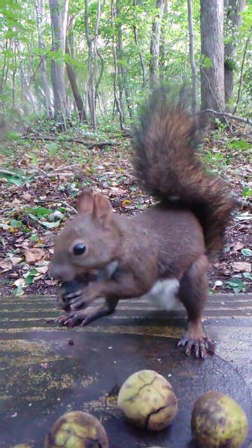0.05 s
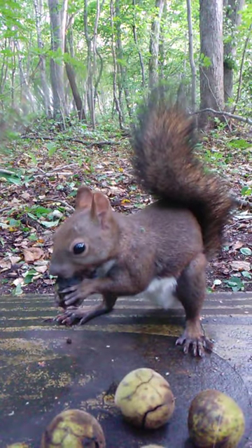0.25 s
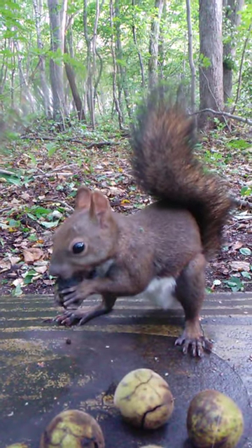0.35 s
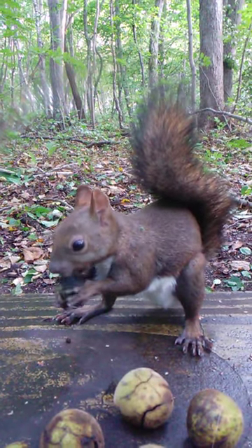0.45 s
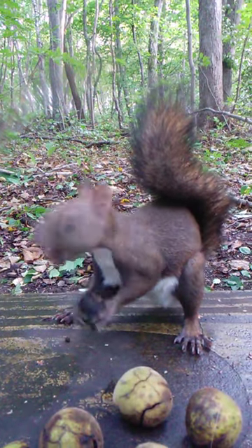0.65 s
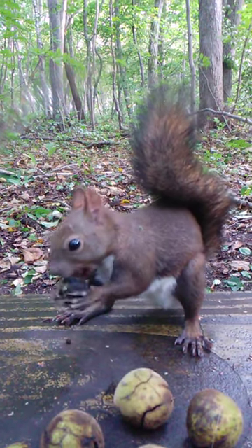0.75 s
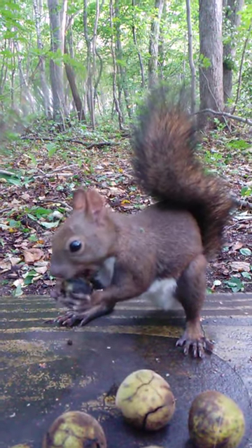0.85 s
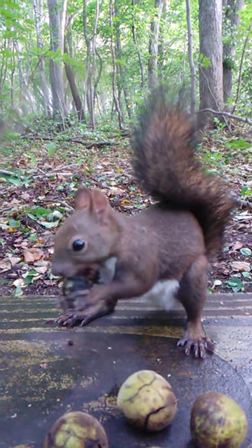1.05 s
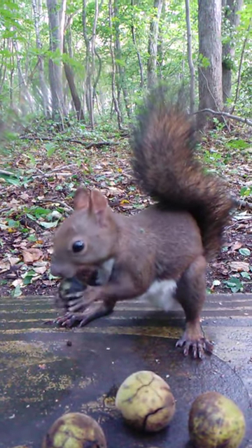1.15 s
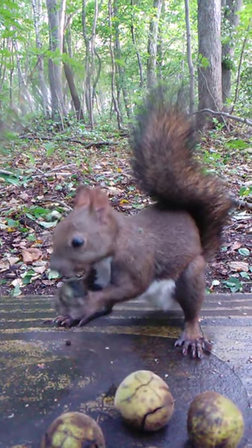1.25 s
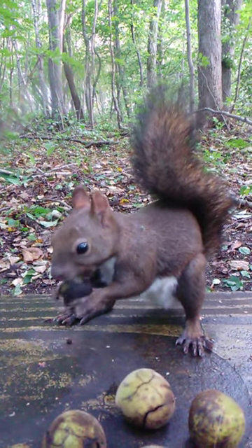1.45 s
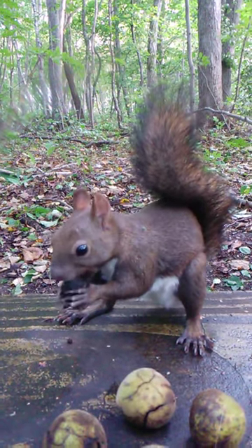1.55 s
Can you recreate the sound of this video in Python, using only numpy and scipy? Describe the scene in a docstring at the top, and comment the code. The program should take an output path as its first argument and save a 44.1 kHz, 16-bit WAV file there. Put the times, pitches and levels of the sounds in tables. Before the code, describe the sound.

Close up in a quiet wood, a squirrel gnaws a nut shell with quick dry scrapes and crisp clicks. A sharper cluster comes first, then a brief pause and softer nibbling, over a faint low rumble and hiss.

```python
"""A squirrel gnaws a walnut

The squirrel sits close by, on a table in a wood. Its teeth scrape the shell in short strokes made
of tiny slips, and now and then a chip snaps off. Both make a ringing sound whose pitch shifts
with the bite. The table top and the trees reflect the sound. Behind it lie a low outdoor rumble,
a faint hum and whine, hiss and thin high ticks."""
import sys
import numpy as np
from scipy import signal
from scipy.fft import rfft, irfft, next_fast_len
from scipy.io import wavfile
from scipy.ndimage import map_coordinates

SR = 44100
rng = np.random.default_rng(int(sys.argv[2]) if len(sys.argv) > 2 else 0)


def generate_wav(sig):
    """Save sig (samples, or channels by samples) to the path in sys.argv[1] as 16-bit PCM at SR."""
    pcm = np.round(np.clip(np.atleast_2d(sig).T, -1, 1) * 32767).astype(np.int16)
    wavfile.write(sys.argv[1], SR, pcm)


N = 70560
BLOCK = 4096  # samples of working space for short sounds


def gain(db):
    """Turn decibels into a number to multiply by."""
    return 10 ** (np.asarray(db) / 20)


def unit_rms(x):
    """Scale a sound so that its average level (rms) is 1."""
    return x / np.sqrt(np.mean(x ** 2) + 1e-20)


def add(track, start_s, sound):
    """Mix a sound into the track at the given time."""
    start = max(0, round(start_s * SR))
    part = sound[:max(0, N - start)]
    track[start:start + len(part)] += part


def filtered(x, response):
    """Multiply each frequency in a sound by response(hz)."""
    size = next_fast_len(N + SR // 2)
    return irfft(rfft(x, size) * response(np.fft.rfftfreq(size, 1 / SR)), size)[:N]


def noise(spectrum):
    """Noise of rms 1, shaped by a curve through (pitch_hz, level_db) points."""
    pitch_hz, level_db = np.transpose(spectrum)
    white = rng.standard_normal(N)
    shaped = filtered(white, lambda hz: gain(np.interp(np.log(hz + 1), np.log(pitch_hz + 1), level_db)))
    return unit_rms(shaped)


def wobble(per_s):
    """A smooth curve through per_s random values each second."""
    return map_coordinates(rng.standard_normal(BLOCK), [np.arange(N) * per_s / SR])


def tone(hz, waver, per_s):
    """A pure tone of rms 1 that wavers at random, by about the share `waver` of its pitch."""
    pitch_hz = hz * (1 + waver * wobble(per_s))
    return unit_rms(np.sin(2 * np.pi * np.cumsum(pitch_hz) / SR))


def ring(peaks):
    """One tap of height 1 that rings at the given pitches. Wide peaks die away fast."""
    freqs = np.fft.rfftfreq(BLOCK, 1 / SR) + 1
    power = sum((gain(db) / (1 + ((freqs ** 2 - hz ** 2) / (freqs * width_hz)) ** 2)) ** 2
                for hz, width_hz, db in peaks)
    # Folding the cepstrum makes all the ringing come after the tap, none before.
    cepstrum = irfft(np.log(power + 1e-8) / 2)
    cepstrum[1:BLOCK // 2] *= 2
    cepstrum[BLOCK // 2 + 1:] = 0
    tap = irfft(np.exp(rfft(cepstrum)))[:BLOCK // 2]
    return tap / np.abs(tap).max()


# How strong the rumble and the hiss are from low to high: pitch_hz, relative_db
RUMBLE_SPECTRUM = [(20, -23), (32, -27), (50, -2.5), (80, 1), (115, -2), (170, -2), (260, -9.5),
                   (450, -14.5), (650, -16), (1000, -20), (1600, -40.5)]
HISS_SPECTRUM = [(600, -28), (1000, -6), (1500, -8), (2600, -13), (5300, -15), (8000, -16.5), (10500, -16),
                 (12300, -7.5), (13400, -6.5), (14400, -8.5), (15000, -3.5), (15800, -9.5)]
# The tones of a faint, distant hum: pitch_hz, level_db
HUM_TONES = [(85, -63), (327, -68), (653, -74)]


def background():
    """Distant rumble and hum that slowly fade, steady hiss and a faint, rough, very high whine."""
    hum = sum(gain(db) * tone(hz, waver=0.0093, per_s=25) for hz, db in HUM_TONES)
    whine = tone(hz=15020, waver=0.004, per_s=45)
    whine = gain(-67.5) * unit_rms(whine * (1 + wobble(per_s=260)))  # its level flickers
    rumble = gain(-54) * noise(RUMBLE_SPECTRUM)
    hiss = gain(-57) * noise(HISS_SPECTRUM)
    fade = gain(-(np.arange(N) - N / 2) / SR)  # 1 dB quieter each second
    return fade * (rumble + hum) + hiss + whine


# The pitches a tick rings at: pitch_hz, width_hz, relative_db
TICK_RING = [(11100, 1800, -4), (14900, 5100, -14), (3900, 1450, -19.5)]
# Thin high ticks: start_s, peak_db
HIGH_TICKS = [(.0200, -39.5), (.1600, -43), (0.2464, -41.5), (0.4307, -43), (0.4812, -36), (.6300, -44),
              (0.6861, -30), (.7614, -39), (0.9804, -41), (1.0300, -41)]


def ticks():
    """Tiny dry ticks high in the treble, each a rasp of about a millisecond."""
    out = np.zeros(N)
    rise_s = 0.00047
    age = np.arange(BLOCK // 8) / SR / rise_s
    for start_s, peak_db in HIGH_TICKS:
        rasp = rng.standard_normal(len(age)) * age * np.exp(-age)
        tick = signal.fftconvolve(rasp, ring(TICK_RING))
        add(out, start_s, gain(peak_db) * tick / np.abs(tick).max())
    return out


def table_and_trees(x):
    """Add one dull reflection off the table top, then a faint tail of echoes from the trees."""
    delay_s, dull_above_hz = 0.00197, 8200

    def table_bounce(hz):
        return gain(-15) * np.exp(-2j * np.pi * hz * delay_s) / (1 + (hz / dull_above_hz) ** 4)

    near = filtered(x, lambda hz: 1 + table_bounce(hz))
    t = np.arange(SR // 2) / SR
    tail = rng.standard_normal(len(t)) * gain(-60 * t / 0.28)  # falls 60 dB in 0.28 s
    return near + gain(-21.5) * signal.fftconvolve(near, tail / np.linalg.norm(tail))[:N]


# The ringing pitches heard in each bite, from the shell and its table echo together:
# pitch_hz, width_hz, relative_db
BITE_PEAKS = [(3070, 440, 0), (3518, 350, 1), (4110, 244, 0.5), (4540, 400, 0), (5080, 490, 2.5)]
# The dull ring of nut and jaw, and the bright ring of the bitten edge: pitch_hz, width_hz, relative_db
NUT_AND_JAW_RING = [(394, 228, -14.5), (900, 920, -15.5), (2440, 3200, -17)]
EDGE_RING = [(8170, 2500, -16.5), (9440, 2200, -11.5), (15000, 5900, -23.5)]


def walnut(bite_hz, bright_db, body_db, knock_hz):
    """One tap on the nut: the bite's ringing pitches, a dull body with a hollow knock, a bright edge."""
    reach_hz = 375  # a bite favours the peaks this close to its own pitch
    bite = [(hz, width, db - 10 * np.log10(1 + ((hz - bite_hz) / reach_hz) ** 4))
            for hz, width, db in BITE_PEAKS]
    knock = (knock_hz, knock_hz / 1.72, -13.5)  # its pitch depends on the grip and where the teeth bite
    body = [(hz, width, db + body_db) for hz, width, db in [*NUT_AND_JAW_RING, knock]]
    edge = [(hz, width, db + bright_db) for hz, width, db in EDGE_RING]
    tap = ring(bite + body + edge)
    # Bending waves carry the treble through the shell sooner than the bass.
    bass_lag_s = 0.000415
    freqs = np.fft.rfftfreq(BLOCK, 1 / SR)
    bending = np.exp(-2j * np.pi * bass_lag_s * freqs * (1 - freqs / SR))
    return irfft(rfft(tap, BLOCK) * bending)[:BLOCK // 2]


# Strokes of the teeth across the shell: start_s, length_s, level_db, pitch_hz, bright_db
TOOTH_STROKES = [(0.067, 0.013, -58, 3530, -2), (0.086, 0.011, -54, 3500, -7),
                 (0.097, 0.018, -46.5, 3520, 3), (0.117, 0.021, -50.5, 3610, 0.5),
                 (0.137, 0.013, -57, 4050, -7), (0.202, 0.0088, -51, 3670, -14),
                 (.207, 0.019, -49, 3670, 1.5), (0.228, 0.025, -59, 3670, -1), (.332, 0.018, -46, 3740, 0),
                 (0.463, 0.011, -49, 3900, -15), (0.561, 0.045, -52.5, 3900, -2.5),
                 (0.8027, 0.049, -47.5, 3250, -6), (0.909, 0.019, -50.5, 3280, -15),
                 (0.927, 0.022, -47, 2960, 0), (.949, 0.0058, -48.5, 3550, -4),
                 (1.042, 0.035, -63.5, 2900, -16), (1.123, 0.0087, -53, 3200, -11),
                 (1.163, 0.027, -51, 2880, -9), (1.22, 0.023, -60.5, 3240, -16),
                 (1.234, 0.015, -52, 3070, -8), (1.25, 0.01, -45.5, 3150, -11.5),
                 (1.263, 0.016, -60, 3080, -3)]


def scrapes():
    """The teeth stick and slip unevenly through each stroke, and every slip taps the nut."""
    out = np.zeros(N)
    slips_per_s, spread_db = 1000, 2
    rise_share, fall_share = 0.11, 0.35  # of a stroke's length
    for start_s, length_s, level_db, pitch_hz, bright_db in TOOTH_STROKES:
        samples = int(np.clip(length_s * SR, SR // 500, BLOCK))
        gaps = rng.exponential(1, BLOCK // 2)
        slip_at = ((np.cumsum(gaps) - gaps[0]) * SR / slips_per_s).astype(int)
        sizes = gain(spread_db * rng.standard_normal(len(gaps)))
        signs = rng.choice([-1, 1], len(gaps))
        slips = np.bincount(slip_at, sizes * signs, BLOCK)[:samples]
        progress = np.linspace(0, 1, samples)
        pressure = np.sqrt(np.interp(progress, [0, rise_share, 1 - fall_share, 1], [0, 1, 1, 0]))
        nut = walnut(pitch_hz, bright_db, body_db=1.5, knock_hz=2310)
        stroke = signal.fftconvolve(slips * pressure, nut)
        rms = np.sqrt((np.sum(stroke ** 2) + 1e-20) / samples)
        add(out, start_s, gain(level_db) * stroke / rms)
    return out


# Chips snapping off the shell: start_s, level_db, pitch_hz, bright_db, body_db, knock_hz
CHIP_SNAPS = [(0.0627, -35.5, 3350, -14, 1, 2300), (.1230, -32.5, 3660, -6, 4, 830),
              (0.2646, -30.5, 3950, -13, 1.5, 1100), (0.269, -28.5, 3870, -1, 5, 413),
              (0.2708, -24.5, 4000, 4, 0, 380), (0.3266, -37, 3580, -21, 0, 1400),
              (0.3403, -25.5, 3550, -6, 3, 1300), (0.3463, -28.5, 3800, -2, 3, 1200),
              (.3581, -21.5, 3480, 1, 5, 1030), (0.3679, -25.5, 4000, -7, 2, 2120),
              (.3915, -8, 4165, 0.5, -8.5, 1230), (0.3964, -16, 4180, 2.5, -3.5, 850),
              (0.4675, -32, 3900, -6, 5, 1950), (.4767, -34.5, 3980, -24, -4, 1950),
              (0.4842, -17, 4000, 5, -1.5, 2020), (.5783, -32, 3280, -10, 6, 600),
              (0.8163, -31, 3250, 1, 7, 1100), (0.8205, -34, 3620, -16, -3, 2110),
              (.8249, -31, 3370, -18, -6, 2130), (0.8432, -32, 3420, -8.5, -9, 2300),
              (.8972, -45, 3260, -18, -8, 2300), (0.9108, -35, 3200, -10, 6, 2100),
              (0.9144, -31, 3200, -15, -4, 2100), (0.9271, -34.5, 3120, -9, 2, 1890),
              (0.932, -30, 3230, 3, 8, 990), (0.9386, -31.5, 2980, -3, 0, 1910),
              (1.0514, -36.5, 2940, -23, -0.5, 2400), (1.1652, -27, 3110, -12.5, -5.5, 1950),
              (1.1717, -32, 2920, -11, -7, 1990), (1.1790, -40, 2960, -23, 2, 2300),
              (1.2417, -32.5, 3130, -15, 3, 1190), (1.2559, -32, 3420, -10, 6, 756),
              (1.5875, -42.5, 3420, -14, -12, 2300)]


def snaps():
    """Each chip that breaks off taps the nut once, then crumbles for a few milliseconds."""
    out = np.zeros(N)
    t = np.arange(BLOCK // 4) / SR
    crumble = np.sqrt(t) * gain(-60 * t / 0.014)  # swells quickly, then dies away
    for start_s, level_db, pitch_hz, bright_db, body_db, knock_hz in CHIP_SNAPS:
        splinters = rng.standard_normal(len(t)) * crumble
        force = gain(-7) * splinters / np.linalg.norm(splinters)
        force[0] += 1  # the break itself
        nut = walnut(pitch_hz, bright_db, body_db, knock_hz)
        add(out, start_s, gain(level_db) * signal.fftconvolve(force, nut))
    return out


def scene():
    """The gnawing over the quiet of the wood, in one channel."""
    gnawing = table_and_trees(snaps() + scrapes())
    return (gnawing + ticks() + background())[None]


def record(dry):
    """Cut away the very highest treble."""
    return np.array([filtered(channel, lambda hz: hz < 15900) for channel in dry])


dry = scene()
out = record(dry)
generate_wav(out)
```